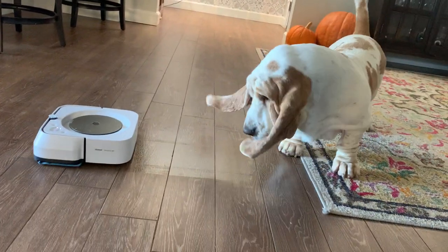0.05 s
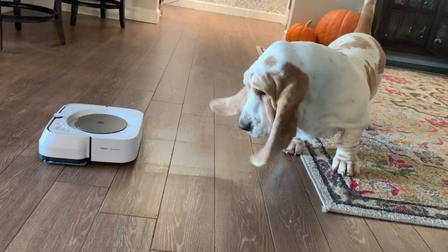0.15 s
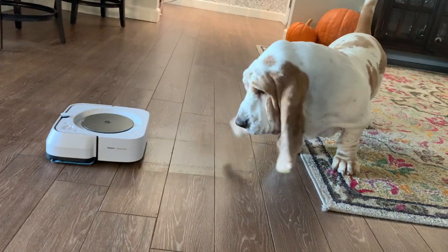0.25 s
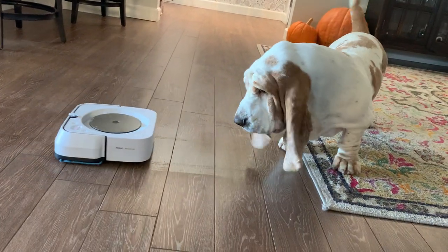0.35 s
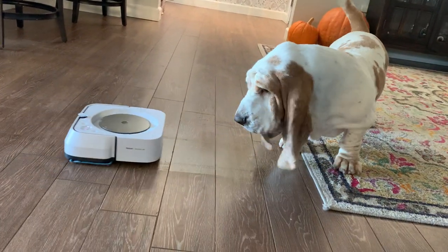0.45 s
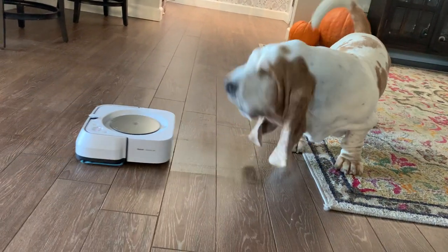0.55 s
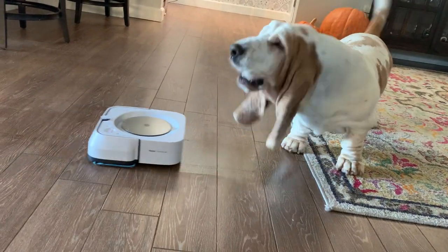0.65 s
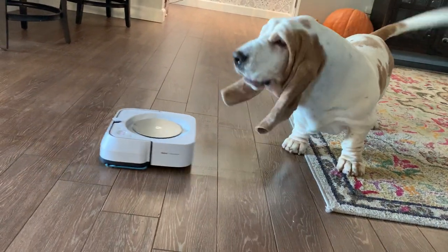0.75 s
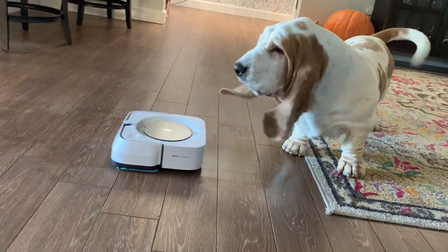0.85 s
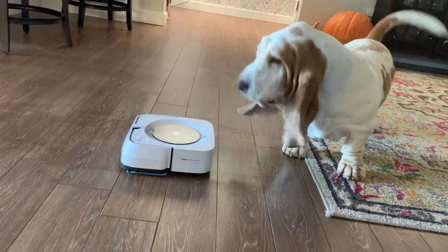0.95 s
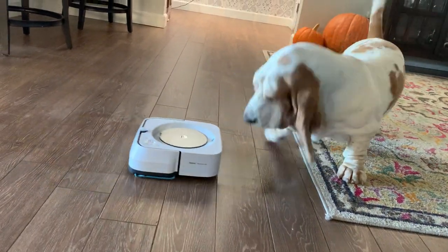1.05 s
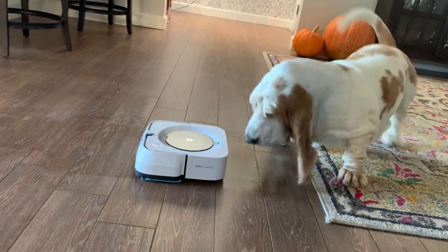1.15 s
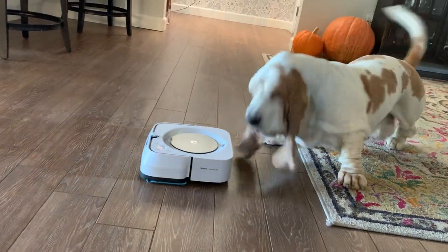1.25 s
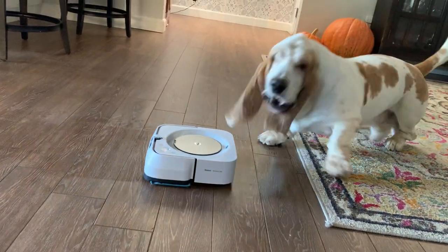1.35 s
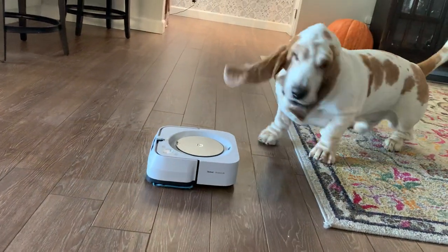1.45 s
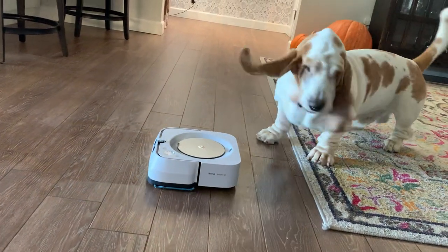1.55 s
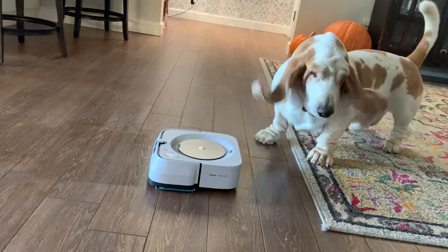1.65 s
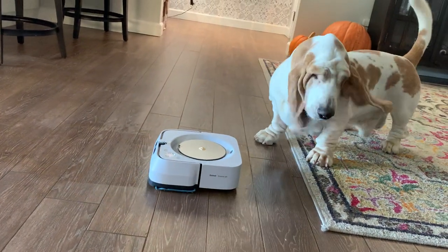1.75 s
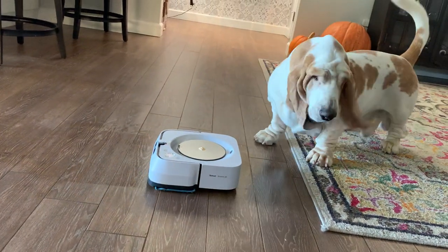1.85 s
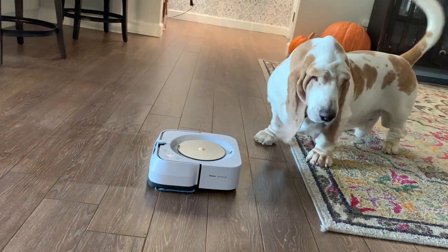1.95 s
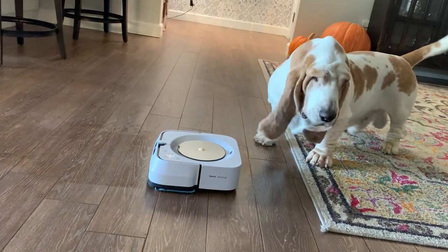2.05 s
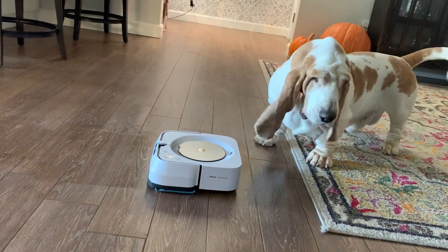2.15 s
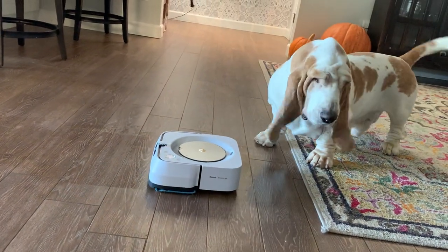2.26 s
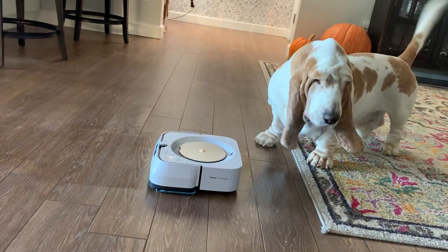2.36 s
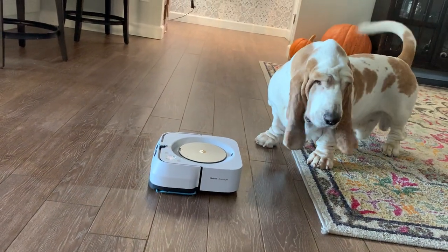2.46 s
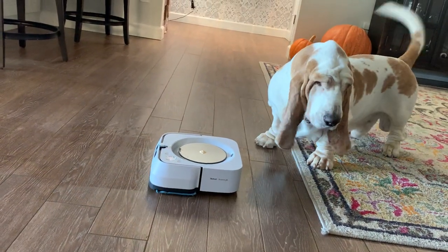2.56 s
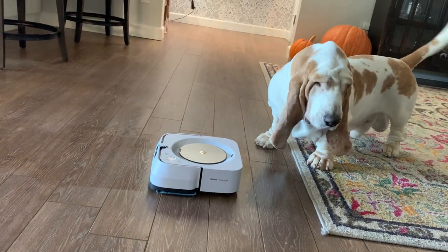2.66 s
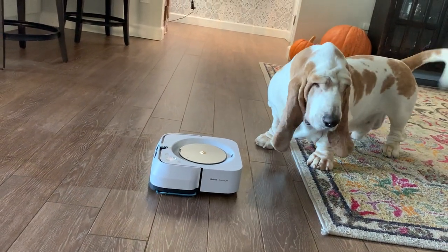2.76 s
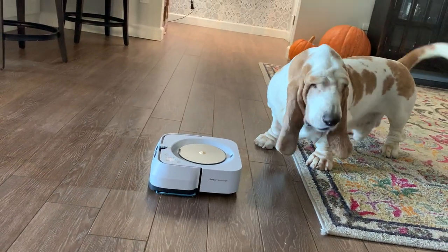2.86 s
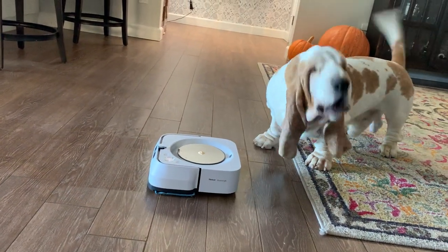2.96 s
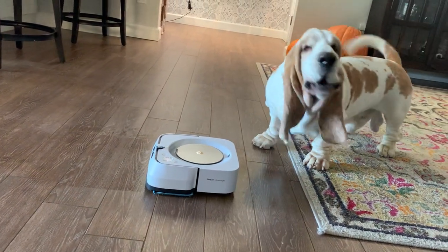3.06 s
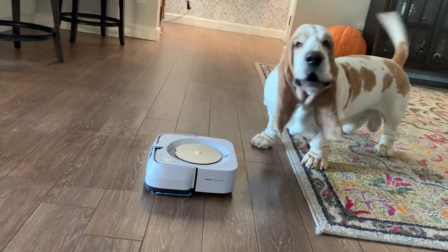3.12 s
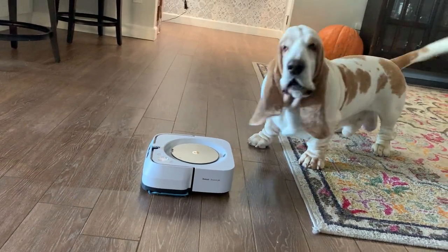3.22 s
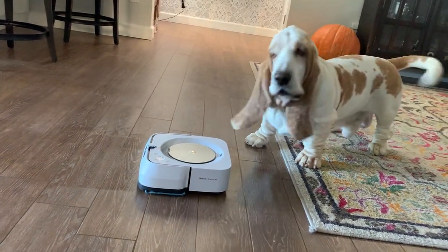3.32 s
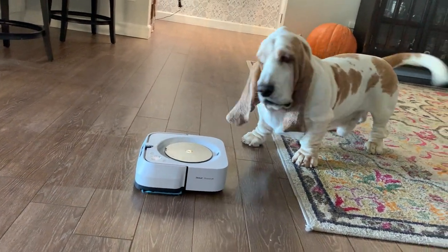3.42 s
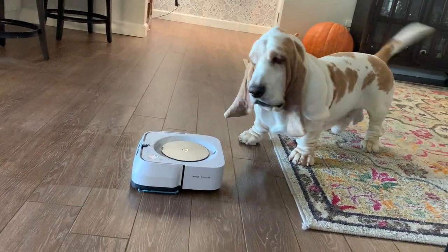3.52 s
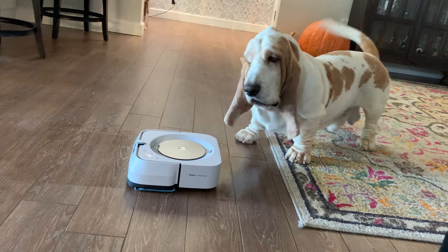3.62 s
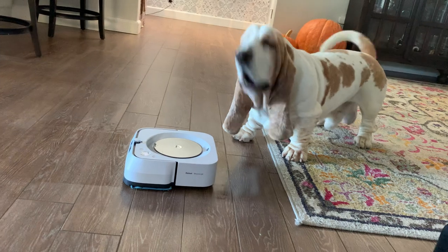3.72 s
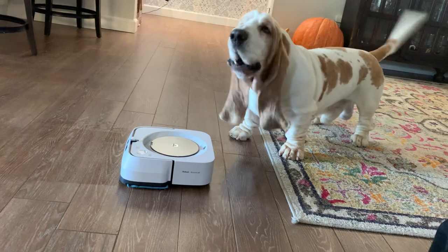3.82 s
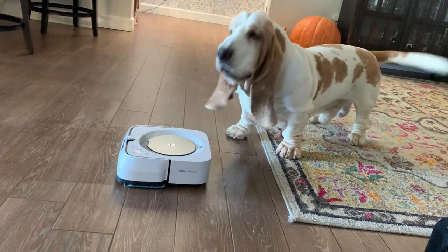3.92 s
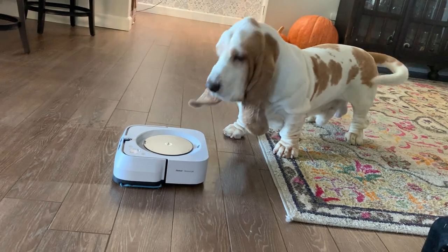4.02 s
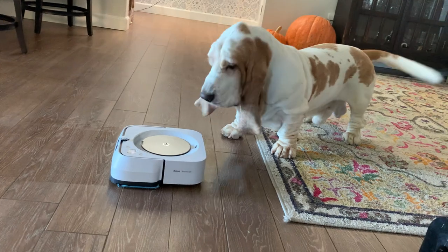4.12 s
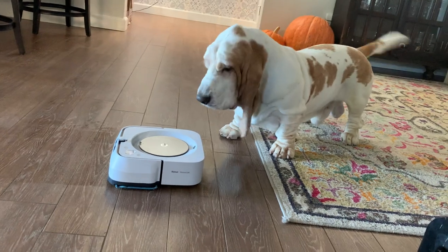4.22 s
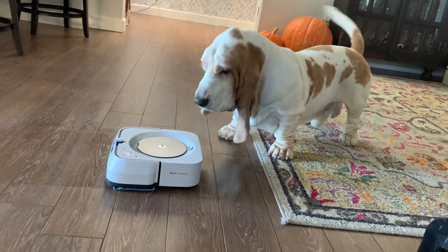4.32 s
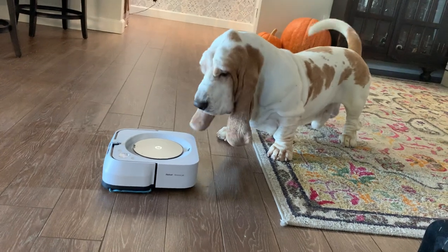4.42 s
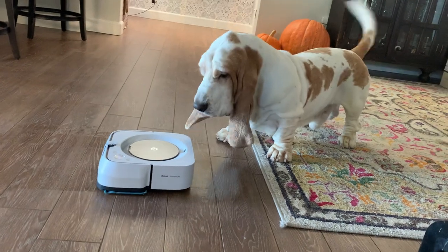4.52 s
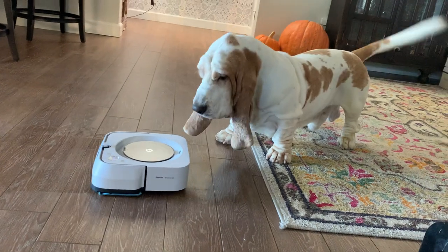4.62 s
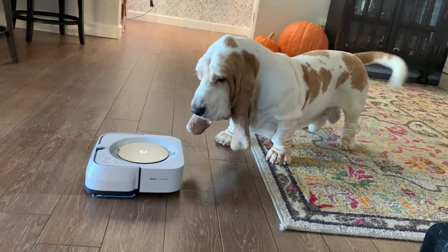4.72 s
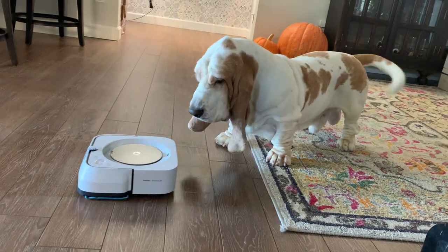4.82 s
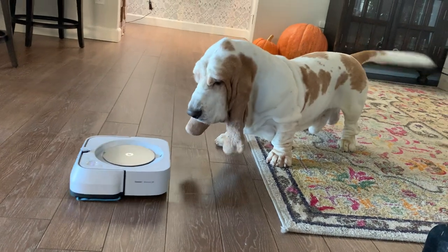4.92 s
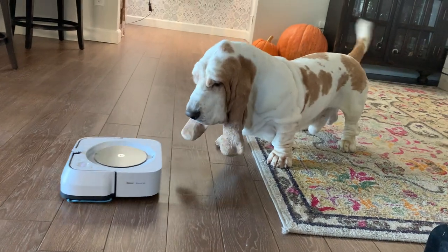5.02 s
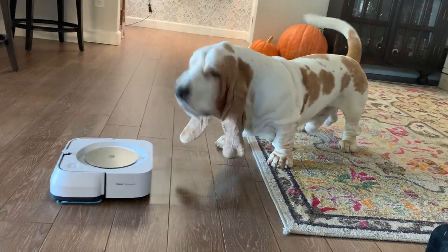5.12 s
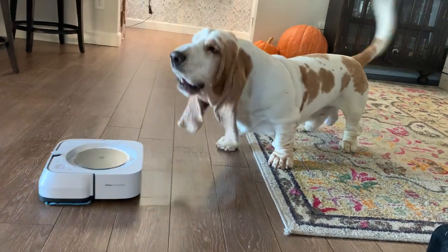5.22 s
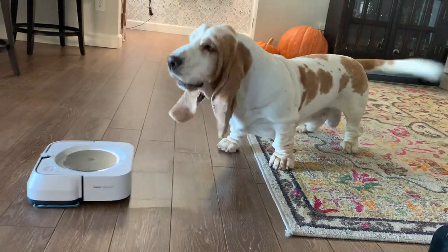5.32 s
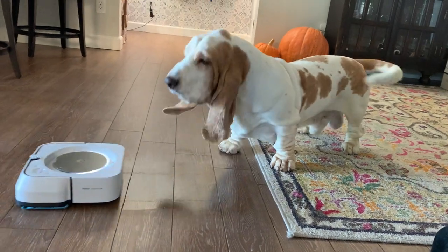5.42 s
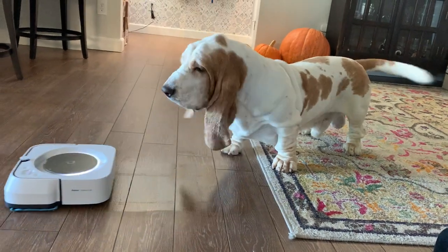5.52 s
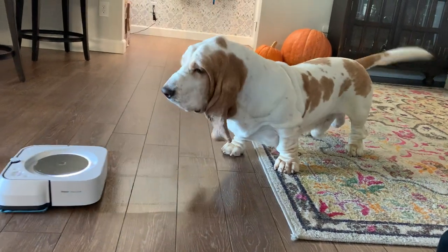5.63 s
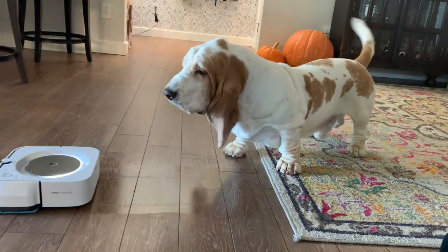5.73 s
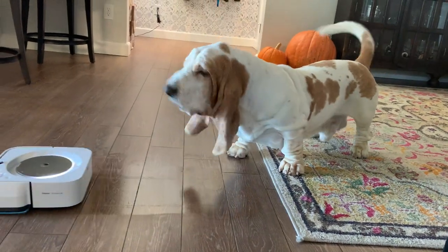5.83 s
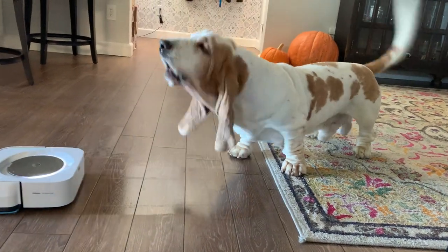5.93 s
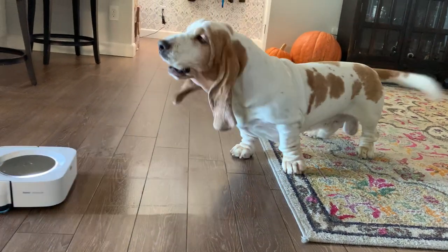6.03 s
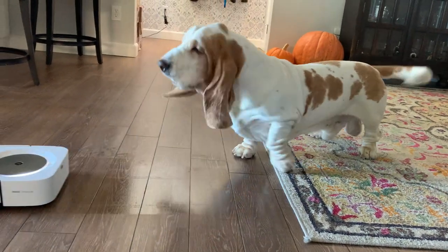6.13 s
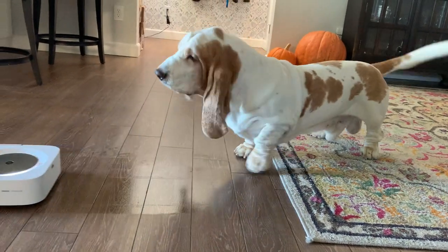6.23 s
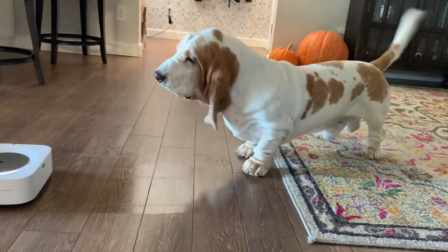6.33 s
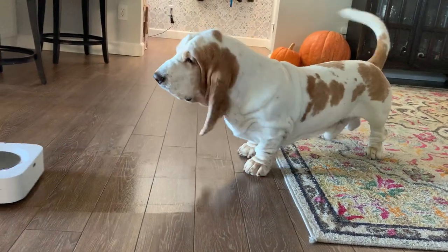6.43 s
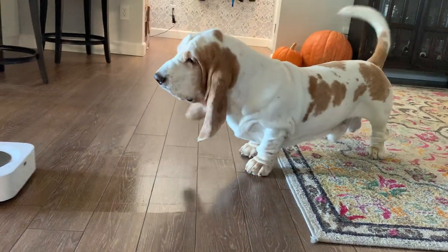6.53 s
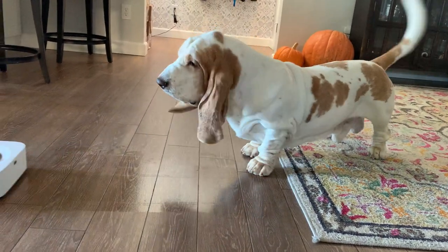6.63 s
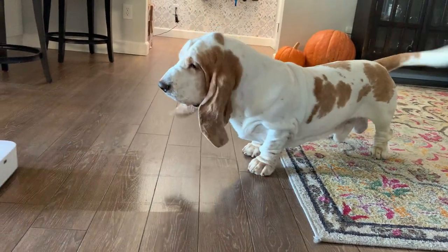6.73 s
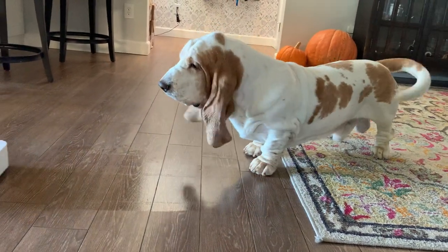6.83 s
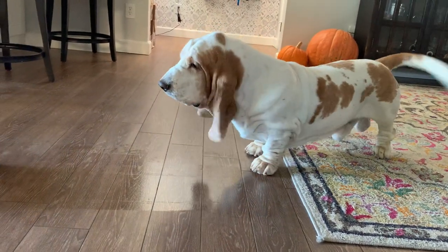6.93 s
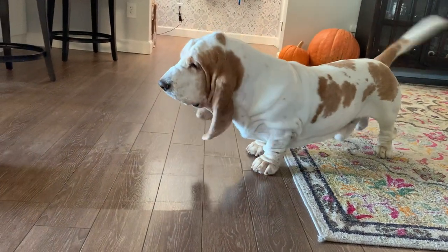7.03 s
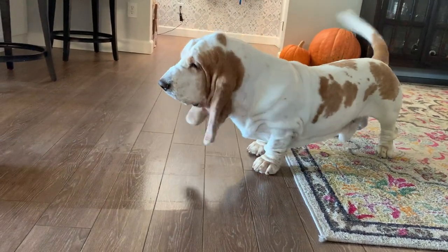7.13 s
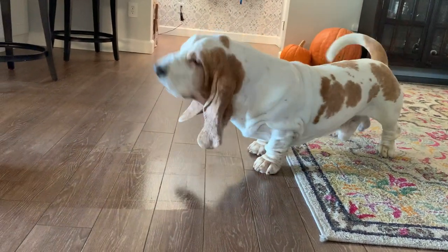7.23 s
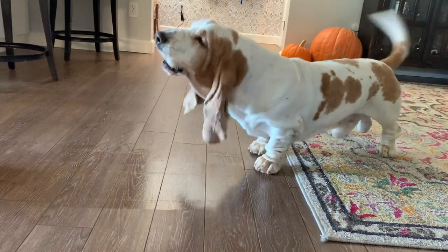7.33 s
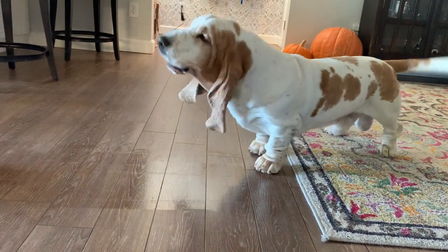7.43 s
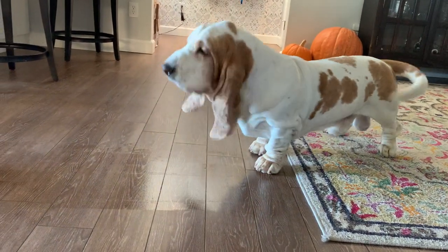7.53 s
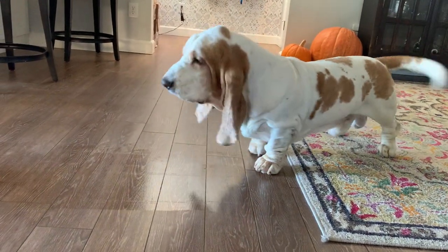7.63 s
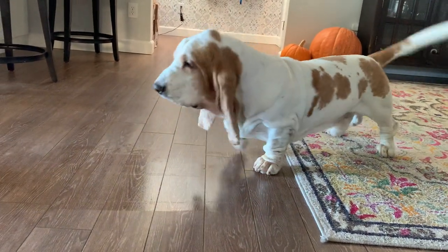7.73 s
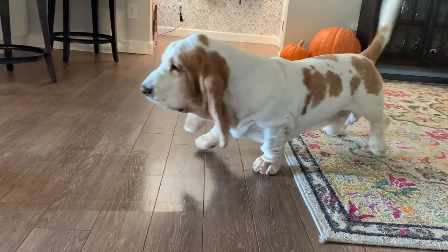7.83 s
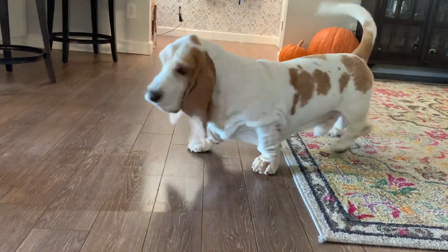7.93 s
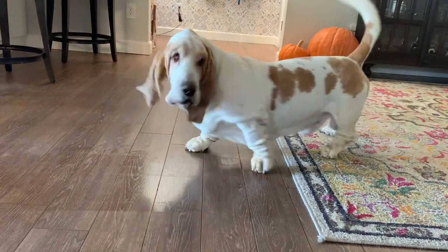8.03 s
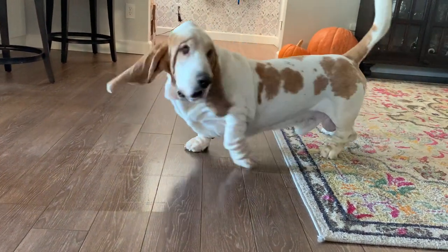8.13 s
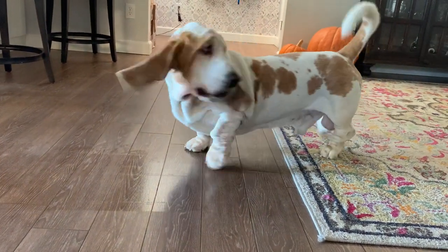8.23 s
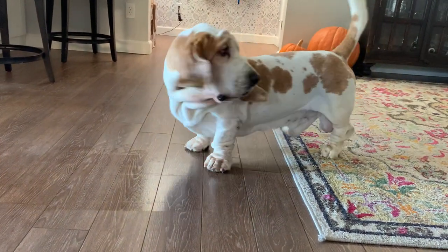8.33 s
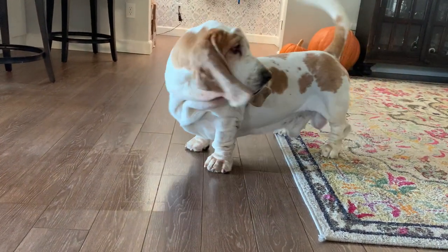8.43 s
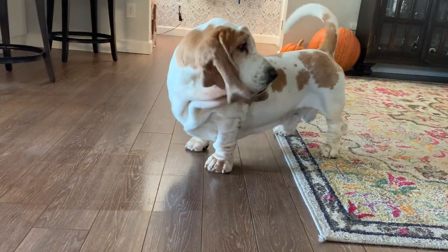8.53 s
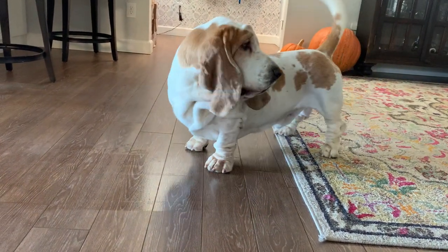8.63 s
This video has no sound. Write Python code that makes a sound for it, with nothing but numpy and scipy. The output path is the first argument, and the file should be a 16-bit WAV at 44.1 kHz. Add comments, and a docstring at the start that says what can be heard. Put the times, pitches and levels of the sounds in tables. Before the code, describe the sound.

A hound barks deeply seven times in a ringing room, with paw thuds and a mopping robot whirring faintly.

```python
"""Hound barking at a mopping robot.

A deep-voiced hound barks seven times in a ringing, hard-floored room. Its vocal folds sweep from a
growl to a clear note and back, shaped by throat, mouth and nose. The small robot's wheels whirr and
its pump whines for a second. Steps and paws thud on the boards and claws tick, over a low house hum."""
import sys
import numpy as np
from scipy import signal
from scipy.fft import rfft, irfft
from scipy.io import wavfile
from scipy.ndimage import uniform_filter1d

SR = 44100
rng = np.random.default_rng(int(sys.argv[2]) if len(sys.argv) > 2 else 0)


def pcm_store(signal):
    """Save signal as 16-bit PCM."""
    levels = np.round(np.clip(np.atleast_2d(signal), -1, 1) * 32767)
    wavfile.write(sys.argv[1], SR, levels.astype(np.int16).T)


N = 382347
TIME_S = np.arange(N) / SR

# Table levels are relative. Spectra give density per Hz.
# Barks. Each row: times of stages 0-6 in seconds, top pitch in Hz, level, fundamental trim and its sag
# at the top in dB, open and settled mouth resonance in Hz, opening bite, settled ring, nose trim and
# upper voice trim in dB, hoarseness 0-1.
BARKS = [ ((.43, .47, .534, .565, .638, .738, .8), 462, -15, .1, -8.5, 1780, 1330, -1.7, .1, 2.5, .1, .04),
         ((1.17, 1.18, 1.24, 1.287, 1.338, 1.406, 1.5),
         439, -12, .1, -1.5, 1700, 1590, -10, 5.4, -1.5, 3, .13),
         ((2.83, 2.843, 2.908, 2.932, 3.006, 3.11, 3.17),
         455, -12.5, .1, -6.5, 1730, 1310, 3, 1.7, 7.3, 1.5, .03),
         ((3.63, 3.643, 3.707, 3.731, 3.785, 3.888, 3.97),
         453, -11.5, .1, -6.5, 1624, 1310, 6.7, 1.3, 4, 1.5, .03),
         ((4.98, 5.046, 5.11, 5.136, 5.22, 5.32, 5.4),
         465, -12, .1, -15.5, 1722, 1310, 2.5, .1, -5, .1, .03),
         ((5.82, 5.828, 5.876, 5.902, 5.96, 6.058, 6.16),
         453, -13, 1.1, -.1, 1480, 1270, 1.9, -1.5, -2.5, -1, .04),
         ((7.13, 7.186, 7.243, 7.283, 7.345, 7.46, 7.54),
         452, -12.5, 1.5, -.1, 1466, 1317, -2, .1, -1.5, -2.2, .08), ]
# Course of a bark. Each row: stage, pitch as a share of the top, fundamental, chest and overtones in dB,
# mouth opening (0 settled, 1 open), mouth resonance, nose and upper voice in dB.
BARK_STAGES = [(0, .135, -41.5, -50, -66.5, .6, -5.5, -80, -71.5),
               (1, .22, -28, -33, -60, .8, -5.5, -76, -68), (1.4, .4, -25, -32, -40, 1.3, -2.5, -58, -56),
               (2, .66, -21, -27, -19, 1.0, 3.5, -39.5, -34.5), (3, .88, 0, -9, -7, .75, 6.5, -27.5, -22.5),
               (3.35, 0.96, 2, -4.5, -0.5, .15, 1.5, -27, -25.5),
               (3.65, .995, .3, -6, -.8, .06, -3, -27, -24), (4, 1.005, 0, -8.5, 1, 0, -8, -26, -23),
               (4.3, 0.97, -4.5, -9, -3, .03, -2.5, -31, -28.5),
               (4.6, .92, -6.5, -12, -7, .05, 3, -38.5, -37),
               (4.75, .84, -16, -24, -19, .05, -1.5, -43, -41),
               (5, .66, -27, -33, -28, .05, -8.5, -45, -42), (6, .16, -40.5, -55.5, -46, .15, -5, -60, -66)]
# Resonances of throat and muzzle. Each row: centre in Hz, width in Hz, level in dB.
THROAT_RESONANCES = [(760, 820, -3.5)]
MUZZLE_RESONANCES = [(3500, 1000, -4), (4750, 1200, -3), (5950, 900, -6), (9340, 3800, -10)]
# Breath noise. Each row: frequency in Hz, level in dB.
BREATH_SPECTRUM = [(400, -34.5), (1500, -17.5), (2300, -11), (2750, -28), (3600, -7.5), (5000, -10),
                   (6900, -8.5), (9400, -3.5), (11000, -9), (13500, -11), (15700, -19)]

# Wheel drive. Each row: time in seconds, level in dB, speed as a share of full.
WHEEL_DRIVE = [(0, -89.5, 0.6), (0.449, -76.5, 0.95), (.9, -87.5, 0.9), (1.101, -100, .8),
               (4.298, -100, .5), (4.7, -78.5, 0.72), (5.102, -68, 0.81), (5.501, -61.5, 1.0),
               (5.999, -60.5, 0.99), (8.0, -61.5, 0.995), (8.67, -63, 0.995)]
# Spray pump. Each row: time in seconds, level in dB, motor tone in Hz.
PUMP_RUN = [(2.389, -90, 3740), (2.449, -84.5, 4010), (2.548, -77.5, 4880), (2.651, -74, 4490),
            (2.801, -80.5, 3700), (3.1, -80.5, 4220), (3.302, -80.5, 4710), (3.522, -81, 4230),
            (3.588, -84, 4190)]
# Wheel noise, full-speed gear tones, pump hiss, pump whine. Each row: frequency in Hz, level in dB.
WHIRR_SPECTRUM = [(180, -48.5), (300, -19), (535, -10), (836, -7.5), (1090, -21), (1520, -16.5),
                  (1650, 2.5), (2040, -8.5), (3090, -4), (7180, -19.5), (9350, -10.5), (11000, -35.5),
                  (11600, -61), (13000, -28.5), (15600, -34.5)]
GEAR_TONES = [(822, -82), (1300, -91), (1648, -72), (2480, -79), (2670, -83.5), (3120, -80), (3850, -83),
              (4300, -81)]
SPRAY_SPECTRUM = [(250, -22), (480, 1.5), (1000, -8.5), (1800, -7), (2400, -18), (4000, -7), (6000, -15.5),
                  (9800, -8.5), (11000, -25.5), (13500, -25), (15600, -28.5)]
WHINE_TONES = [(10045, -77), (9598, -79), (10450, -84)]

# Steps and paws. Each row: start in seconds, level in dB, slap trim in dB, slap corner in Hz,
# thud T60 in seconds.
FOOTFALLS = [(2.11, -64.5, -24, 9000, 0.41), (2.18, -55, -36, 9000, .3), (2.968, -29.5, -31, 9000, 0.045),
             (4.211, -54.5, -25.5, 9000, 0.23), (4.556, -48.5, -28, 9000, 0.55),
             (4.851, -52.5, -17.5, 9000, 0.91), (5.499, -71.5, -27.5, 9000, 0.53),
             (5.779, -34, -3, 1100, 0.07), (6.62, -54, -6.5, 2500, 0.44), (6.838, -41.5, -14, 3000, 0.65),
             (7.715, -32, -7, 11000, 0.48), (8.288, -26, -12, 11500, 0.48)]
# The two parts of a footfall. Each row: frequency in Hz, level in dB.
THUD_SPECTRUM = [(15, -35.5), (25, -11.5), (107, 0.5), (202, -5), (339, -16), (401, -14), (537, -23),
                 (700, -24), (910, -42.5), (1540, -120)]
SLAP_SPECTRUM = [(180, -29.5), (300, 2), (568, -9.5), (1020, -7), (1170, -11), (1620, -9.5), (9490, -34),
                 (11500, -30.5), (15000, -32.5)]
# Claws on the floor. Each row: start in seconds, level in dB, tone in Hz.
CLAW_TICKS = [(0.0375, -65, 3170), (0.9443, -65, 2870), (1.0284, -47.5, 3460), (1.0444, -49, 2860),
              (4.3246, -64.5, 2746)]

# Steady floor rumble. Each row: time in seconds, level in dB.
RUMBLE_LEVELS = [(0.0, -75), (4.7, -71.5), (8.67, -65)]
# Weight shifting on the boards. Each row: centre in seconds, level in dB, half length in seconds.
RUMBLE_SWELLS = [(.54, -57, .07), (2.17, -69.5, .18), (2.9, -65.5, .2), (3.84, -61, .06),
                 (4.38, -59.5, .13), (5.05, -47.5, .05), (5.55, -58.5, .12), (6.03, -50, .07),
                 (7.24, -59, .1), (8.45, -53, .07)]
# Board rumble, appliance hum, still air. Each row: frequency in Hz, level in dB.
BOARD_SPECTRUM = [(12, -29), (20, 3), (138, -5), (416, -31.5), (608, -43.5), (857, -32.5), (1080, -48.5),
                  (1350, -25), (1500, -58), (1950, -78.5), (3300, -120)]
HUM_TONES = [(118.4, -79.5)]
AIR_SPECTRUM = [(88, -37), (150, 1.5), (226, -15.5), (420, -5), (950, -21), (1200, -15), (4000, -27),
                (5790, -33.5), (15600, -49.5)]

# Room decay. Each row: frequency in Hz, T60 in seconds.
ROOM_T60_S = [(60, .3), (170, .37), (340, 0.46), (1400, 0.59), (2700, 0.55), (5400, 0.4), (11000, 0.25)]
# Colour of the room's tail. Each row: frequency in Hz, level in dB.
TAIL_SPECTRUM = [(100, -7), (450, 6), (1400, -8), (3000, -5.5), (10000, 4)]
# Echoes off floor, cupboards and walls. Each row: delay in seconds, level in dB, sign.
EARLY_ECHOES = [(.0037, -9, 1), (.0091, -13, -1), (.0143, -14, 1), (.021, -15, -1), (.029, -16, 1)]
# Microphone port balance. Each row: frequency in Hz, left minus right in dB.
PORT_BALANCE_DB = [(60, 0.5), (150, 3.5), (380, 0), (950, -3.5), (2380, -1.5), (5980, -4.5), (15000, 3.5)]
# Microphone port phase. Each row: frequency in Hz, left lead in radians.
PORT_LEAD_RAD = [(300, 0.17), (600, 0.78), (1200, 0.78), (2500, 1.22), (4800, 1.5), (7150, 1.87),
                 (9040, 0.3), (11100, -3), (15300, -8)]

MOUTH_WIDTH_HZ, NOSE_HZ, NOSE_WIDTH_HZ = 300, 2250, 420
POCKET_HZ, POCKET_WIDTH_HZ = 2720, 420  # absorbing pocket beside the throat
JITTER_HZ, SLACK_JITTER_HZ, SLACK_FLUTTER_DB = 2.2, 26, 4
TOP_STAGE, SAG_REACH_STAGES = 4, .28
MOTOR_LOW_RATIO, SLAP_DB_PER_OCTAVE, AIR_DB = .385, -14, -82.5
BASS_CUT_HZ, BAND_LIMIT_HZ, CEILING = 46, 15700, .93
DIP_LOW_HZ, DIP_HIGH_HZ = 11050, 12150


def bark(stages_s, top_hz, level_db, first_trim_db, sag_db, open_hz, settled_hz,
         bite_db, ring_db, nose_trim_db, upper_trim_db, hoarseness):
    """Vocal-fold partials shaped by chest, throat, mouth, nose and muzzle; air puffs once a cycle."""
    t = np.arange(stages_s[0], stages_s[-1], 1 / SR)
    n = len(t)
    stage = np.interp(t, stages_s, np.arange(len(stages_s)))
    knots, *columns = np.transpose(BARK_STAGES)
    pitch_share, first_db, chest_db, overtone_db, opening, mouth_db, nose_db, upper_db = (
        uniform_filter1d(np.interp(stage, knots, column), 700, mode="nearest") for column in columns)
    first_db += first_trim_db + sag_db * np.exp(-((stage - TOP_STAGE) / SAG_REACH_STAGES) ** 2)
    upper_db += upper_trim_db
    mouth_db += ring_db + (bite_db - ring_db) * np.clip(2 * opening, 0, 1)
    mouth_hz = settled_hz + (open_hz - settled_hz) * opening

    pitch_hz = top_hz * pitch_share
    slack = hoarseness + np.clip(1 - pitch_share, 0, 1) ** 1.5  # slack folds run ragged
    phase = phase_rad(pitch_hz + (JITTER_HZ + SLACK_JITTER_HZ * slack) * wander(n, .003))
    harmonic = np.arange(2, 26)[:, None]
    partial_hz = harmonic * pitch_hz

    chest = gain(chest_db) * resonance(partial_hz, centre_hz=330, width_hz=500)
    throat = sum(gain(db) * resonance(partial_hz, hz, width) for hz, width, db in THROAT_RESONANCES)
    mouth = gain(mouth_db) * resonance(partial_hz, mouth_hz, MOUTH_WIDTH_HZ)
    nose = gain(nose_db + nose_trim_db + 4.5) * resonance(partial_hz, NOSE_HZ, NOSE_WIDTH_HZ)
    rise = (mouth_hz / 1400) ** .4  # muzzle follows mouth
    muzzle = sum(gain(db) * resonance(partial_hz, hz * rise, width)
                 for hz, width, db in MUZZLE_RESONANCES)
    flicker_db = 6 * np.array([wander(n, .015) for _ in harmonic])
    weights = chest + gain(overtone_db) * (throat + mouth) + nose
    weights += gain(upper_db - 6.5 + flicker_db) * muzzle
    weights *= gain(SLACK_FLUTTER_DB * slack * wander(n, .004))
    weights *= 1 - .9 * resonance(partial_hz, POCKET_HZ, POCKET_WIDTH_HZ)

    overtones = (weights * np.sin(harmonic * phase + harmonic ** 2)).sum(0)
    folds = gain(first_db) * np.sin(phase) + overtones
    shimmer = gain(.47 * wander(n, .0049))
    breath = stereo_noise(BREATH_SPECTRUM, n, correlation=.89)[0]
    puffs = breath * (1 + .33 * np.cos(phase)) * gain(2.2 * wander(n, .011))
    voice = np.sqrt(2) * folds * shimmer + gain(upper_db - 7) * puffs
    return stages_s[0], gain(level_db) * voice * signal.windows.tukey(n, .12)


def wheels():
    """Motor whirr plus wavering gear tones that track the speed."""
    times_s, drive_db, speed = np.transpose(WHEEL_DRIVE)
    speed = np.interp(TIME_S, times_s, speed) + .004 * wander(N, .02)
    gears = sum(gain(db) * (.8 + .6 * wander(N, .012)) * np.sin(phase_rad(hz * speed))
                for hz, db in GEAR_TONES)
    whirr = stereo_noise(WHIRR_SPECTRUM, N, correlation=.2)
    return gain(np.interp(TIME_S, times_s, drive_db)) * (gain(-2.5) * whirr + gain(66.5) * gears)


def pump():
    """Throbbing hiss, fuzzy motor tones gliding with the load, thin high whines."""
    times_s, level_db, motor_hz = np.transpose(PUMP_RUN)
    t = np.arange(times_s[0], times_s[-1], 1 / SR)
    n = len(t)
    phase = phase_rad(np.interp(t, times_s, motor_hz) * (1 + .015 * wander(n, .003)))
    motor = gain(-10.5) * np.sin(phase) + gain(-11) * np.sin(MOTOR_LOW_RATIO * phase)
    whine = sum(gain(db + 2.9 * wander(n, .029)) * np.sin(2 * np.pi * hz * t) for hz, db in WHINE_TONES)
    throb = gain(np.interp(t, times_s, level_db) + 10 + 1.5 * wander(n, .024))
    hiss = stereo_noise(SPRAY_SPECTRUM, n, correlation=.42)
    return times_s[0], (throb * (hiss + motor) + whine) * signal.windows.tukey(n, .03)


def footfalls():
    """A quick push sets the boards rumbling, with a brighter slap on top."""
    out, t = np.zeros((2, N)), np.arange(SR) / SR
    for start_s, level_db, slap_db, corner_hz, t60_s in FOOTFALLS:
        dulled = [(hz, db + SLAP_DB_PER_OCTAVE * max(np.log2(hz / corner_hz), 0))
                  for hz, db in SLAP_SPECTRUM]
        thud = stereo_noise(THUD_SPECTRUM, SR, correlation=.89)
        thud *= gain(-60 * t / t60_s) * (1 - np.exp(-t / .0027))
        slap = stereo_noise(dulled, SR, correlation=.27)
        slap *= gain(slap_db + 7 - 60 * t / (1.18 * t60_s)) * (1 - np.exp(-t / .016))
        add(out, start_s, gain(level_db - 4.5) * (thud + slap))
    return out


def claws(t60_s=.01):
    """Claws strike the floor in short noisy ticks."""
    out, t = np.zeros(N), np.arange(600) / SR
    for start_s, db, hz in CLAW_TICKS:
        tick = np.sin(2 * np.pi * hz * t) + .35 * rng.standard_normal(len(t))
        add(out, start_s, gain(db - 60 * t / t60_s) * tick)
    return out


def house():
    """Lumpy, swelling board rumble, wavering appliance hum, still air."""
    steady = gain(np.interp(TIME_S, *np.transpose(RUMBLE_LEVELS)))
    swells = sum(gain(db) * np.exp(-((TIME_S - s) / half_s) ** 2) for s, db, half_s in RUMBLE_SWELLS)
    lumps = gain(3.5 * wander(N, .06))
    rumble = (steady + swells) * lumps * stereo_noise(BOARD_SPECTRUM, N, correlation=.99)
    hum = sum(gain(db + 3.5 + 1.5 * wander(N, .1)) * np.sin(2 * np.pi * hz * TIME_S)
              for hz, db in HUM_TONES)
    return rumble + hum + gain(AIR_DB) * stereo_noise(AIR_SPECTRUM, N, correlation=.7)


def room(source, tail_db):
    """Direct path, early echoes and a tail of sparse reflections dying band by band."""
    taps = np.zeros((3, SR))
    slots = np.arange(400, SR - 20, 20) + rng.integers(0, 20, (3, (SR - 401) // 20))
    np.put_along_axis(taps, slots, rng.choice([-1., 1.], slots.shape), 1)
    taps = .7 * taps[0] + .7 * taps[1:]  # shared plus per-channel
    hz, t, bands = signal.stft(taps, SR, nperseg=256)
    decay_db = log_interp(TAIL_SPECTRUM, hz)[:, None] - 60 * t / log_interp(ROOM_T60_S, hz)[:, None]
    echoes = signal.istft(bands * gain(decay_db), SR, nperseg=256)[1]
    echoes *= 1 - np.exp(-np.arange(echoes.shape[1]) / SR / .023)  # builds as walls join in
    echoes *= gain(tail_db) / np.linalg.norm(echoes[0])
    for delay_s, db, sign in EARLY_ECHOES:
        echoes[:, round(delay_s * SR)] += gain(db) * sign
    return source + signal.fftconvolve(source[None], echoes, axes=1)[:, :N]


def microphone_ports(sound):
    """Two ports hear each frequency at their own level and phase."""
    hz = np.fft.rfftfreq(N, 1 / SR)
    side = np.array([[.5], [-.5]])
    balance = gain(side * log_interp(PORT_BALANCE_DB, hz))
    lead = np.exp(1j * side * log_interp(PORT_LEAD_RAD, hz))
    return irfft(balance * lead * rfft(sound), N)


def resonance(hz, centre_hz, width_hz):
    """Gain of a steep resonance."""
    return (1 + (2 * (hz - centre_hz) / width_hz) ** 2) ** -1.7


def stereo_noise(spectrum, n, correlation):
    """Two partly alike channels of coloured noise, rms 1."""
    left, other = rng.standard_normal((2, n))
    right = correlation * left + np.sqrt(1 - correlation ** 2) * other
    colour = gain(log_interp(spectrum, np.fft.rfftfreq(n, 1 / SR)))
    return unit_rms(irfft(rfft([left, right]) * colour, n))


def wander(n, span_s):
    """Smooth random drift, rms 1."""
    size = int(span_s * SR)
    return unit_rms(uniform_filter1d(uniform_filter1d(rng.standard_normal(n), size), size))


def phase_rad(hz):
    """Running phase of a varying frequency."""
    return 2 * np.pi * np.cumsum(hz) / SR


def gain(db):
    """Decibels to amplitude."""
    return 10 ** (np.asarray(db) / 20)


def unit_rms(x):
    """Scales to rms 1."""
    return x / np.sqrt(np.mean(x ** 2) + 1e-20)


def log_interp(table, hz):
    """Reads a table on a log-frequency axis."""
    knots_hz, values = np.transpose(table)
    return np.interp(np.log(hz + 1), np.log(knots_hz + 1), values)


def add(mix, start_s, sound):
    """Mixes a sound in at start_s."""
    part = mix[..., round(start_s * SR):][..., :sound.shape[-1]]
    part += sound[..., :part.shape[-1]]


def scene():
    """Barks and claws through the room, over robot, footfalls and house."""
    dog = np.zeros(N)
    for row in BARKS:
        add(dog, *bark(*row))
    in_room = room(gain(-4) * dog, tail_db=-6.5) + room(claws(), tail_db=-8)
    mix = microphone_ports(in_room) + wheels() + footfalls() + house()
    add(mix, *pump())
    return mix


def record(dry):
    """Final tone: bass cut, rounded peaks, treble dips near 11.5 kHz, top end rolled off."""
    dip = signal.firwin(401, [DIP_LOW_HZ, DIP_HIGH_HZ], window=("kaiser", 6), fs=SR)
    band_limit = signal.firwin(511, BAND_LIMIT_HZ, window=("kaiser", 9), fs=SR)
    thinned = signal.sosfilt(signal.butter(2, BASS_CUT_HZ, "high", fs=SR, output="sos"), dry)
    rounded = thinned / (1 + (thinned / CEILING) ** 6) ** (1 / 6)
    return signal.oaconvolve(rounded, np.convolve(dip, band_limit)[None], "same")


dry = scene()
out = record(dry)
pcm_store(out)
```